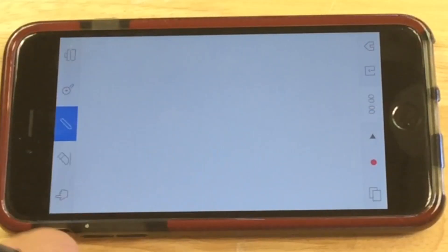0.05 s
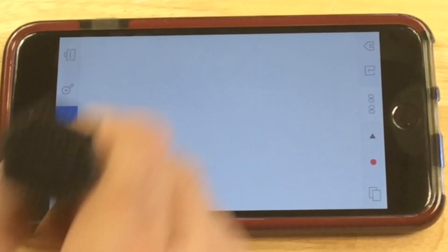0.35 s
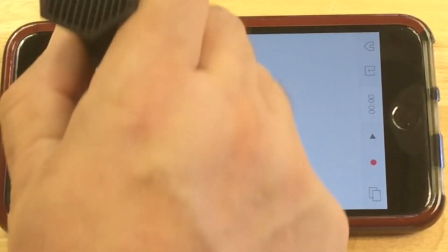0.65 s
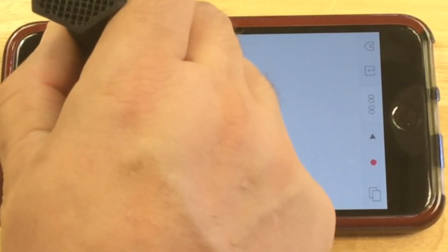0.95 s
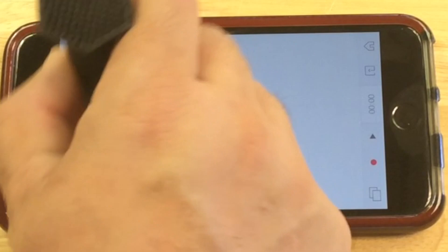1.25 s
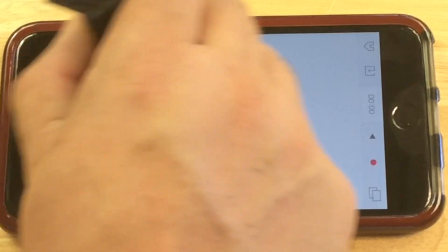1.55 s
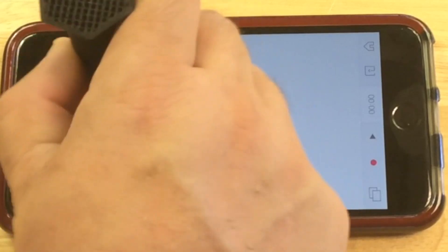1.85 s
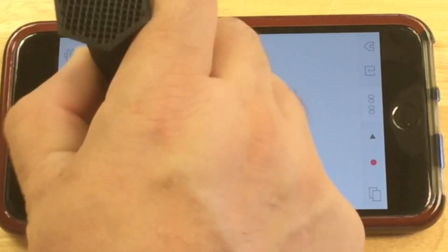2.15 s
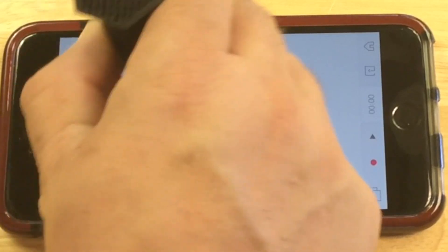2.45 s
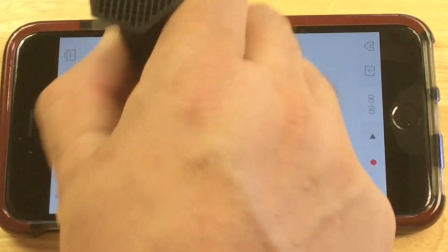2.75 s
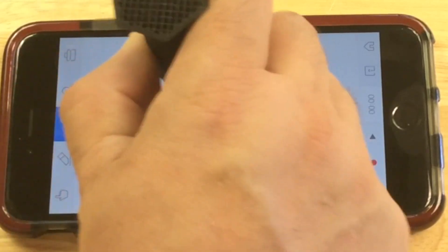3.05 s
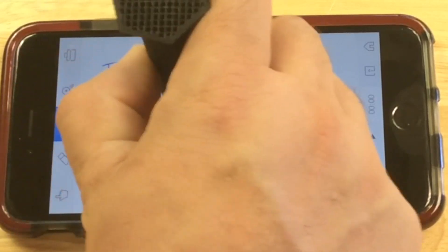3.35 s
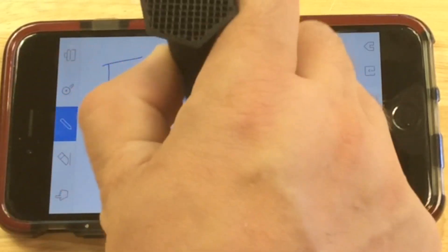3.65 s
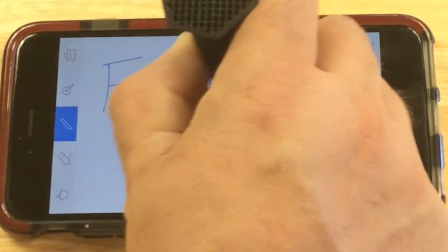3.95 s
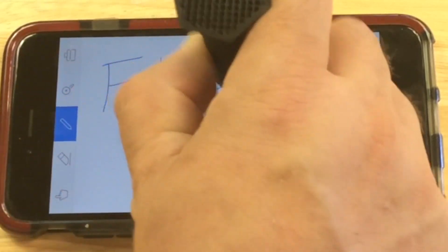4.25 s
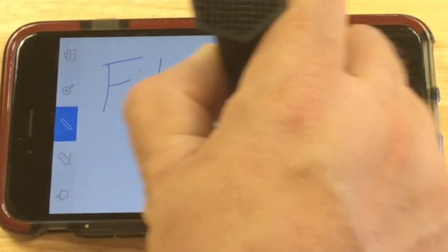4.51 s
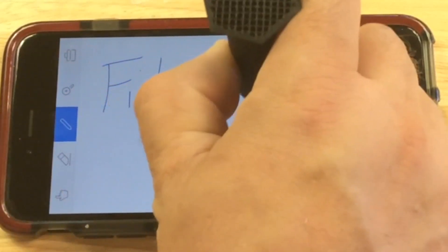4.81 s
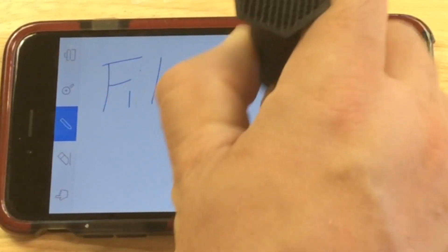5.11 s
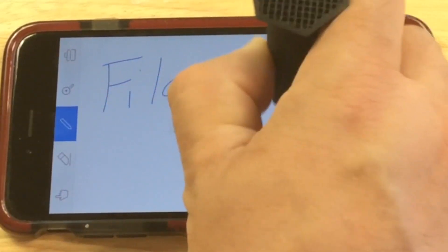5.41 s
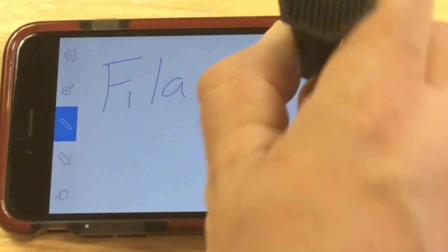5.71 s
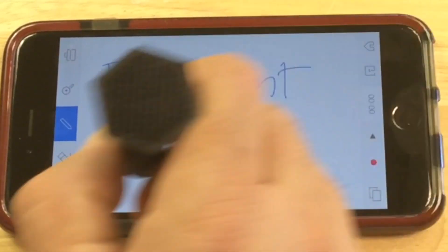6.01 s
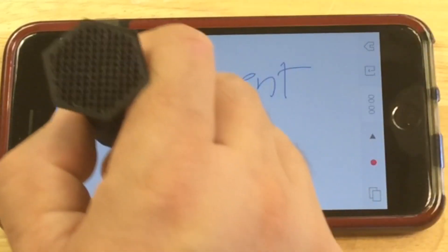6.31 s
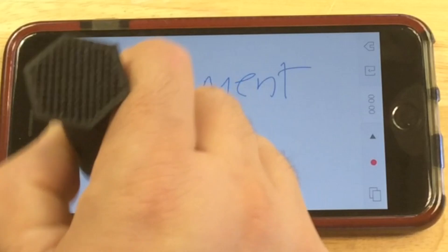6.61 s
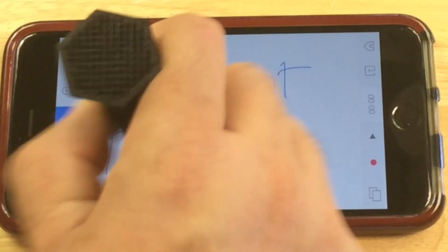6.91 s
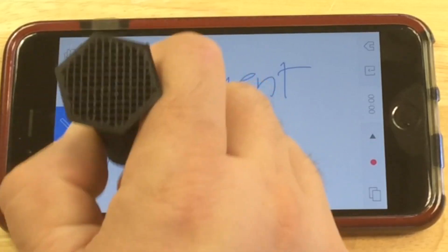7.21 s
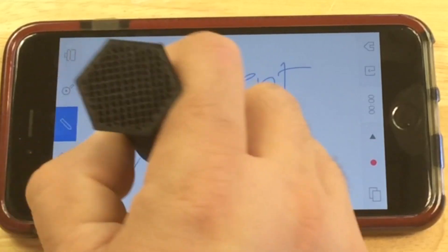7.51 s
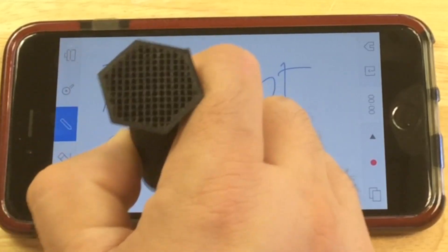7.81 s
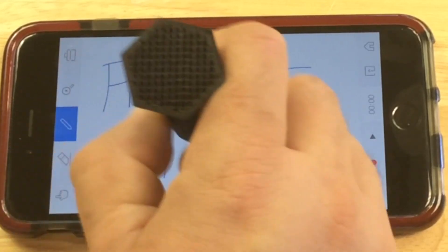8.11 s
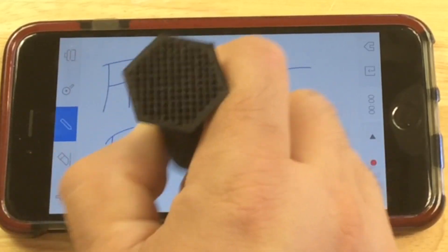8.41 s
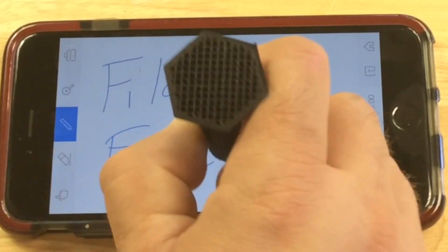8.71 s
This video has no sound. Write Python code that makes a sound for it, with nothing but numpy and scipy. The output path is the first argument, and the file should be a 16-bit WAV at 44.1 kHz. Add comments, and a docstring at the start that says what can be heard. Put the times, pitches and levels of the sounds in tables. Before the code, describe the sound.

Quiet room air, a thin hiss and very faint electronic whines run throughout, with a soft low rumble swelling now and then. From about 1.1 seconds a chunky plastic stylus taps on the glass screen of a phone lying on a wooden desk, close to the microphone. About twenty short, hollow clicks come unevenly, two or three a second, some sharp and some duller, each with a light thud from the desk and a brief small-room ring. Nothing is heard of the glide between them. From 3.8 seconds a faint low hum, like an engine beyond the walls, rises twice in pitch, booming slightly around 4.6 and again from 5.5, and is gone by 6.6. The taps pause after 5.6 seconds, return with three stronger knocks between 6.5 and 7.1, and go on until a last lighter one at 8.8.

```python
"""Air noise, hiss and thin electronic whines open the scene, with a rumble that swells now and then.
From 1.1 s a chunky plastic stylus writes on a phone lying on a wooden desk: each impact excites the
modes of glass, case and hollow barrel, the desk thuds in sympathy, and a small room reverberates.
From 3.8 s a low hum, like an engine beyond the walls, rises twice in pitch and booms at a resonance
of the room. It is gone by 6.6 s; the taps go on until 8.8 s."""
import sys
import numpy as np
from scipy import signal
from scipy.fft import rfft, irfft, next_fast_len
from scipy.io import wavfile
from scipy.ndimage import map_coordinates

SR = 44100
rng = np.random.default_rng(int(sys.argv[2]) if len(sys.argv) > 2 else 0)


def int16_out(signal):
    """Quantize to a 16-bit WAV file."""
    q = np.round(np.clip(np.atleast_2d(signal).T, -1, 1) * 32767)
    wavfile.write(sys.argv[1], SR, q.astype(np.int16))


N = 395136
SECONDS = np.arange(N) / SR


def stylus(direct_db, chatter_db, desk_db, room_db, case_db=4, glass_db=7.5):
    """Impact excitation: each touch-down drives phone, desk and room; the glide between is silent."""
    # touch-downs: t/s, level/dB near 1 kHz; relative to it, phone thud/dB, barrel clack/dB, brightness/dB;
    # top treble/dB over the brightness; favoured case resonance f/Hz, favoured glass resonance f/Hz
    taps = [(1.0782, -20.0, -2, 0.5, -15.5, 8, 930, 3130), (1.5379, -15, 0.5, 5.5, -2.5, 4.5, 970, 2990),
            (1.9113, -11, -1.5, 5, -4.5, 6.5, 1000, 3150), (2.2159, -6.0, -8, -1.5, -7.0, 7, 600, 4220),
            (2.467, -8.5, -1.5, -3, -3, 5, 1590, 4240), (2.751, -16.0, 2.5, 5.5, 0.5, 10, 680, 4200),
            (3.1181, -22.5, 6.5, 1.5, -22, -0.5, 710, 3350), (3.6544, -14.5, 3.5, 1, 0.5, 5.5, 710, 3930),
            (4.35, -9.5, 0.5, -1.5, -4, 13, 710, 2670), (4.7807, -10.5, -1, -2.5, -7, -4, 1530, 4900),
            (5.2827, -10.5, -5.0, -6, -12.5, 8.5, 590, 4700),
            (5.6127, -7, -2.5, -8.5, -10.5, 7, 1880, 4740), (6.5109, -5, -10, -4.5, -7, 0.5, 556, 5760),
            (6.825, -2.5, -8.5, -4, -9, 2, 565, 2140), (7.0788, -2, -8.5, -6, -7, 3.5, 585, 2260),
            (7.3647, -12.5, -1, -6.5, -0.5, -4.5, 1040, 1880),
            (7.793, -15.5, 4.5, 3.5, 7.0, -4.5, 1820, 5400), (8.023, -10, -1.5, -4.5, -1.5, -4, 1640, 1970),
            (8.2168, -7.0, -4, -4, -5, 6.5, 1690, 2000), (8.8156, -18.5, 3, 0.5, -4, 6.5, 804, 2000)]
    direct, diffuse = np.zeros(N), np.zeros(N)
    for s, db, thud_db, clack_db, bright_db, edge_db, case_hz, glass_hz in taps:
        blow = amp(db) * knock([thud_db, 0, clack_db, bright_db, bright_db + edge_db])
        beamed = directivity(blow, [(case_hz, case_db), (glass_hz, glass_db)])
        add(direct, s, beamed)
        add(direct, s, amp(chatter_db) * chatter(beamed, t60=0.017, above_hz=1650))
        add(diffuse, s, signal.fftconvolve(blow, room_tail(build_s=0.0012)))
    near = amp(direct_db) * direct + reflections(direct, echo_db=-0.5, dull_hz=6300)
    answer = amp(desk_db) * desk(direct, build_s=0.009) + amp(room_db) * diffuse
    return radiated(near, cancel_hz=395) + radiated(answer, cancel_hz=55)


def knock(contact_db, size=2048):
    """Modal superposition: damped modes of alternating sign, weighted by the spectrum of the contact."""
    # modes of stylus and phone together: f/Hz, bandwidth/Hz, level/dB
    modes = [(590.6, 89, -4), (1007, 243, 1.1), (1354, 411, 3.5), (1697, 584, -1.5), (2620, 322, -14.5),
             (3470, 520, -13.5), (4200, 470, -18.5), (6210, 1560, -12.5), (6656, 295, -20),
             (7730, 290, -36)]
    # points at which contact_db gives the contact spectrum: f/Hz
    contact_hz = [600, 1050, 1650, 3200, 6300]
    t = np.arange(size) / SR
    ring = -sum((-1) ** k * amp(db) * np.sin(2 * np.pi * hz * t) * np.exp(-np.pi * width * t)
                for k, (hz, width, db) in enumerate(modes))
    contact = amp(along(contact_hz, contact_db, np.fft.rfftfreq(size, 1 / SR)))
    return irfft(rfft(ring) * minimum_phase(contact))


def directivity(blow, favoured, width_octaves=0.11):
    """Directional radiation: each spot on the screen beams its own resonances of case and glass."""
    grid = np.fft.rfftfreq(len(blow), 1 / SR)
    lift_db = sum(db * np.exp(-.5 * (np.log2((grid + 1) / hz) / width_octaves) ** 2) for hz, db in favoured)
    return irfft(rfft(blow) * minimum_phase(amp(lift_db)))


def chatter(blow, t60, above_hz):
    """Sliding friction: the tip skids for a few milliseconds as it lands, roughening the treble."""
    t = np.arange(SR // 30) / SR
    skid = rng.standard_normal(len(t)) * amp(-60 * t / t60)
    return signal.fftconvolve(highpass(blow, above_hz, order=3), skid / np.linalg.norm(skid))


def radiated(x, cancel_hz):
    """Acoustic short circuit: air slips round a small body from front to back and cancels its bass."""
    return highpass(x, cancel_hz, order=2)


def desk(x, build_s):
    """Sympathetic vibration: the desk takes up each blow gradually and rings at its natural frequencies."""
    # modes of the desk and the things on it: f/Hz, level/dB, T60/s
    modes = [(122.4, 11.5, 0.17), (205.4, 5.5, 0.7), (249.7, -0.5, 0.3), (290, 4.5, 0.21), (321, 8.5, 0.37),
             (374.6, 4.5, 0.29), (399, 2.5, 0.054), (453, 0, 0.17), (640, -33, 0.05), (640, -10.5, 0.11),
             (1042, -16, 0.24), (1138, -10, 0.14), (1097, -14, .15), (1340, -19.5, 0.14)]
    t = np.arange(SR // 2) / SR
    ring = np.zeros(len(t))
    for hz, db, t60 in modes:
        damping = np.log(1000) / t60
        envelope = amp(db) * 2 * damping / SR * np.exp(-damping * t)
        ring += envelope * np.sin(2 * np.pi * (hz * t + rng.random()))
    return signal.fftconvolve(x, build_up(ring, build_s))[:N]


def reflections(x, echo_db, dull_hz):
    """Early reflection: near surfaces return delayed, slightly dulled copies."""
    # reflection paths: delay t/s, relative level/dB
    echoes = [(0.0047, -45.5), (0.0061, -24.5), (0.0083, -21.5), (0.0093, -20.5), (0.0108, -36),
              (0.0108, -25), (0.013, -46), (0.016, -35), (0.0176, -28), (0.0289, -38.5)]
    paths = np.zeros(SR // 10)
    for delay, db in echoes:
        paths[round(delay * SR)] += amp(db + echo_db)
    return filtered(signal.fftconvolve(x, paths)[:N], lambda hz: 1 / np.hypot(1, hz / dull_hz))


def room_tail(build_s):
    """Reverberation: a diffuse field builds up, then each frequency decays at its own exponential rate."""
    # diffuse response of the room: f/Hz, level/dB, T60/s
    bands = [(60.5, 7.5, 0.31), (129, 4.5, 0.1), (318, -8, 0.6), (560, -17, 0.2), (1090, -24.5, .23),
             (2000, -15.5, 0.19), (2790, -14.5, 0.22), (4930, -14, 0.18), (7000, -23.5, 0.21),
             (13000, -6, 0.104)]
    knots, db, t60 = np.transpose(bands)
    hz, t, spectra = signal.stft(rng.standard_normal(SR // 2), SR, nperseg=512)
    decay_s = along(knots, t60, hz)[:, None]
    colour = amp(along(knots, db, hz))[:, None]
    equal_energy = np.sqrt(2 * np.log(1000) / (decay_s * SR))  # a longer decay adds no energy
    fade = amp(-60 * t / decay_s)
    tail = signal.istft(spectra * fade * equal_energy * colour, SR, nperseg=512)[1]
    return build_up(tail, build_s)


def engine(level_db, overtone_db, approach_db_per_s=2.5, fade_s=0.11, boom_hz=122.8, boom_width_hz=10.4):
    """Forced resonance: walls pass little but the firing tone, which booms as it crosses a room mode."""
    # firing rate of the distant engine: t/s, f/Hz
    firing = [(3.8, 93.6), (4.03, 107.5), (4.51, 123.1), (4.65, 126.9), (4.86, 121.9), (5.07, 107.1),
              (5.28, 104.4), (5.48, 119.8), (5.7, 126.7), (6.3, 126.9), (6.55, 111.2)]
    # one surge before it lets off: crest t/s, Gaussian width/s, rise/dB
    surge = [(6.32, 0.12, 4)]
    times, rates = np.transpose(firing)
    hz = np.interp(SECONDS, times, rates)
    start, end = times[0], times[-1]
    db = level_db + approach_db_per_s * (SECONDS - (start + end) / 2) + swelling(surge)
    boom = 1 / np.hypot(1, 2 * (hz - boom_hz) / boom_width_hz)
    fade = np.clip(np.minimum(SECONDS - start, end - SECONDS) / fade_s, 0, 1)
    phase = 2 * np.pi * np.cumsum(hz) / SR
    return np.sqrt(2) * fade * boom * amp(db) * (np.sin(phase) + amp(overtone_db) * np.sin(2 * phase))


def rumble(floor_db):
    """Transmission through walls: mostly bass gets in, as a noise that swells four times."""
    # swells: crest t/s, Gaussian width/s, rise/dB
    swells = [(1.2, 0.27, 7.5), (4.25, 0.29, 12.5), (5.9, .8, 9.5), (8.5, 0.15, 6.5)]
    # rumble spectrum: f/Hz, relative level/dB
    colour = [(25, -29.5), (55, -22), (75, -20), (110, 2), (145, -2), (190, -18.5), (400, -25),
              (1000, -74.5)]
    return amp(floor_db + swelling(swells)) * noise(colour)


def whines(waver_db):
    """Amplitude and phase modulation: pure tones of a fan and electronics waver at random."""
    # tones: f/Hz, mean rms level/dB
    tones = [(1200, -84), (1523, -82), (1556, -81), (3354, -87), (8302, -83), (8969, -90), (9300, -91)]
    sound = np.zeros(N)
    for hz, db in tones:
        envelope = np.sqrt(2) * amp(db + waver_db * wobble(0.69))
        sound += envelope * np.sin(2 * np.pi * hz * SECONDS + 0.32 * wobble(8.1))
    return sound


def air_and_hiss(air_db, hiss_db, drift_db):
    """Broadband noise: steady room air lies under a microphone hiss that drifts slightly in level."""
    # spectrum of air and microphone noise: f/Hz, relative level/dB
    air_colour = [(12, -50.5), (20, -15), (43, -2.5), (108, -5), (191, -9), (383, -15.5), (569, -17.5),
                  (628, -22), (747, -19), (889, -23.5), (1530, -27.5), (1870, -31), (7500, -36),
                  (9750, -47), (16500, -120)]
    # hiss spectrum: f/Hz, relative level/dB
    hiss_colour = [(1000, -61.5), (7600, -16.5), (8200, -1.5), (9000, 0), (9700, -2), (12000, -3.5),
                   (15500, -7)]
    hiss = amp(hiss_db + drift_db * wobble(5)) * noise(hiss_colour)
    return amp(air_db) * noise(air_colour) + hiss


def whistle(level_db, waver_db, hz=3020):
    """Phase modulation makes a faint high tone unsteady in pitch, while its level wavers slowly."""
    envelope = amp(level_db + waver_db * wobble(1.2))
    return envelope * np.sin(2 * np.pi * hz * SECONDS + 1.3 * wobble(25))


def amp(db):
    """Decibels to amplitude ratio."""
    return 10 ** (np.asarray(db) / 20)


def along(knots_hz, values, hz):
    """Interpolation on a log-frequency axis."""
    return np.interp(np.log(hz + 1), np.log(np.asarray(knots_hz) + 1), values)


def wobble(rate):
    """Spline interpolation of random values, rate knots a second."""
    return map_coordinates(rng.standard_normal(int(N * rate / SR) + 4), [SECONDS * rate])


def swelling(rows):
    """A sum of Gaussian rises in dB, one for each row."""
    return sum(db * np.exp(-.5 * ((SECONDS - s) / width_s) ** 2) for s, width_s, db in rows)


def build_up(x, build_s):
    """Onset transient: x grows smoothly from silence."""
    t = np.arange(len(x)) / SR
    return x * (1 - np.exp(-(t / build_s) ** 2))


def highpass(x, hz, order):
    """Maximally flat attenuation below a cut-off frequency."""
    return signal.sosfilt(signal.butter(order, hz, "highpass", fs=SR, output="sos"), x)


def filtered(x, response):
    """Linear filtering: the spectrum of x times a frequency response."""
    size = next_fast_len(N + SR // 2)
    return irfft(rfft(x, size) * response(np.fft.rfftfreq(size, 1 / SR)), size)[:N]


def noise(colour):
    """Spectral shaping: noise of rms 1, coloured by rows of f/Hz, level/dB."""
    knots, db = np.transpose(colour)
    shaped = filtered(rng.standard_normal(N), lambda hz: amp(along(knots, db, hz)))
    return shaped / np.sqrt(np.mean(shaped ** 2) + 1e-20)


def minimum_phase(gain):
    """Cepstral folding gives the causal response that has this gain."""
    cepstrum = irfft(np.log(gain))
    half = len(cepstrum) // 2
    cepstrum[1:half] *= 2
    cepstrum[half + 1:] = 0
    return np.exp(rfft(cepstrum))


def add(track, s, sound):
    """Superpose a sound on the track at time s."""
    part = track[round(s * SR):][:len(sound)]
    part += sound[:len(part)]


def scene():
    """Superposition: the taps close by, everything else faint behind them."""
    writing = stylus(direct_db=-0.5, chatter_db=-2.0, desk_db=4.0, room_db=4.5)
    outside = engine(level_db=-40.5, overtone_db=-32) + rumble(floor_db=-61)
    inside = whines(waver_db=2.0) + air_and_hiss(air_db=-55, hiss_db=-68, drift_db=0.75)
    return (writing + outside + inside + whistle(level_db=-79.5, waver_db=1.5))[None]


def record(dry, low_cut_hz=50, top_hz=15550):
    """Band limiting: the microphone thins the deep bass and passes nothing above top_hz."""
    thinned = highpass(dry[0], low_cut_hz, order=2)
    return filtered(thinned, lambda hz: hz < top_hz)[None]


dry = scene()
out = record(dry)
int16_out(out)
```